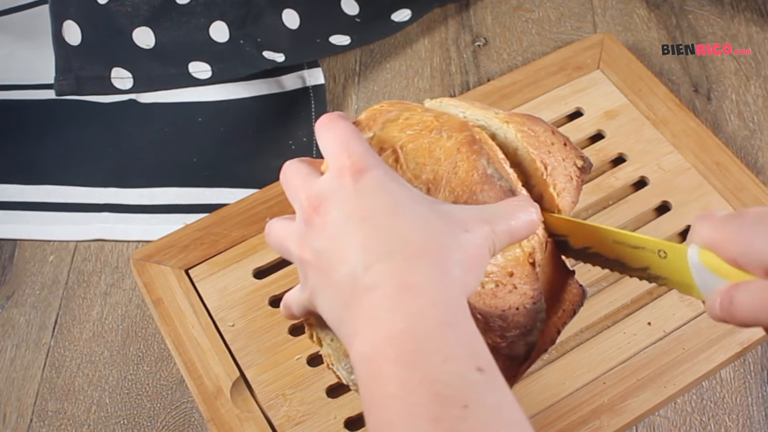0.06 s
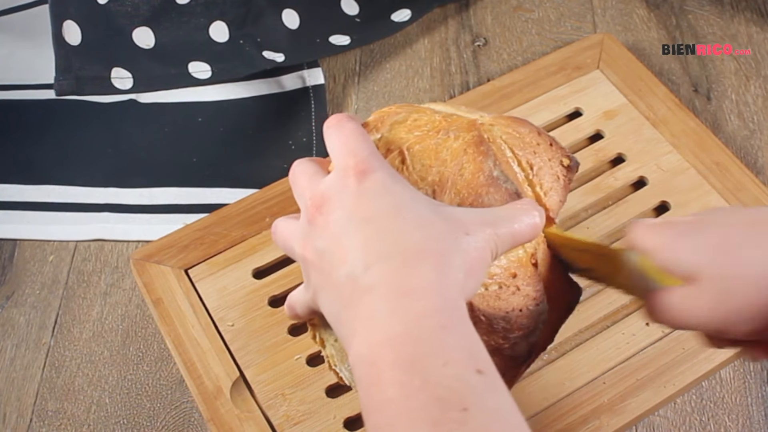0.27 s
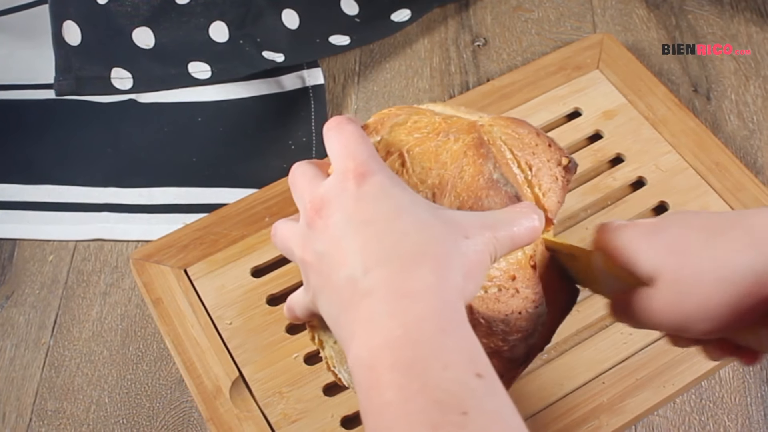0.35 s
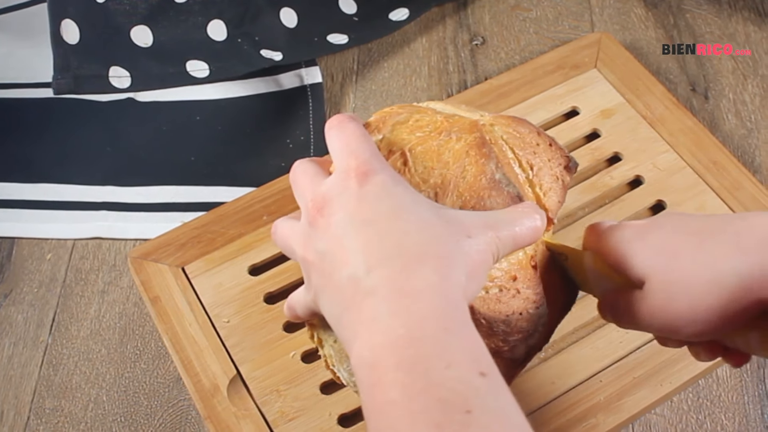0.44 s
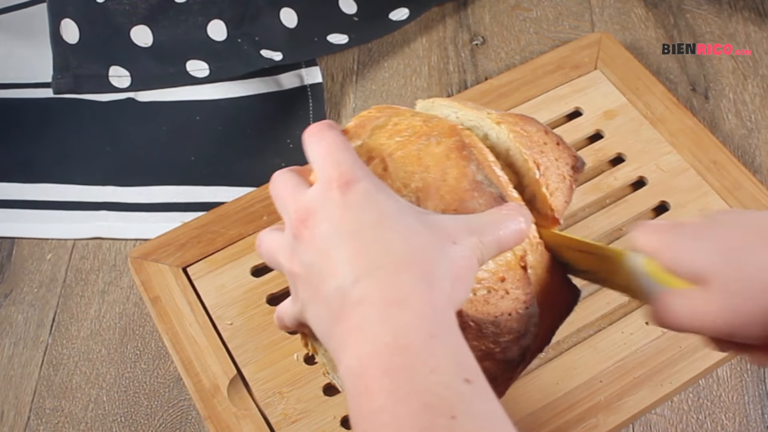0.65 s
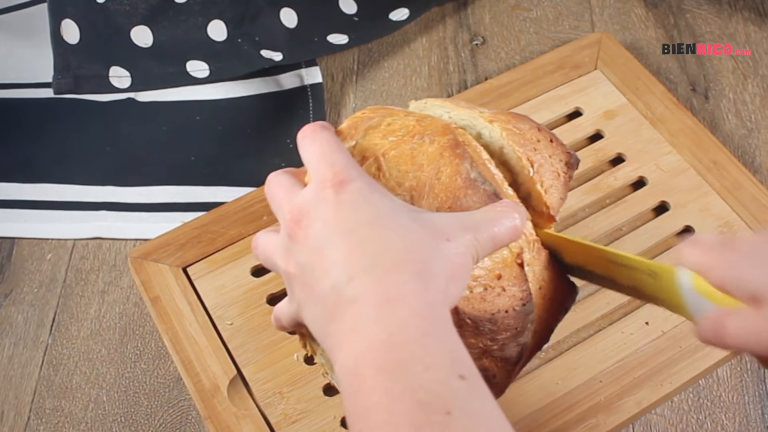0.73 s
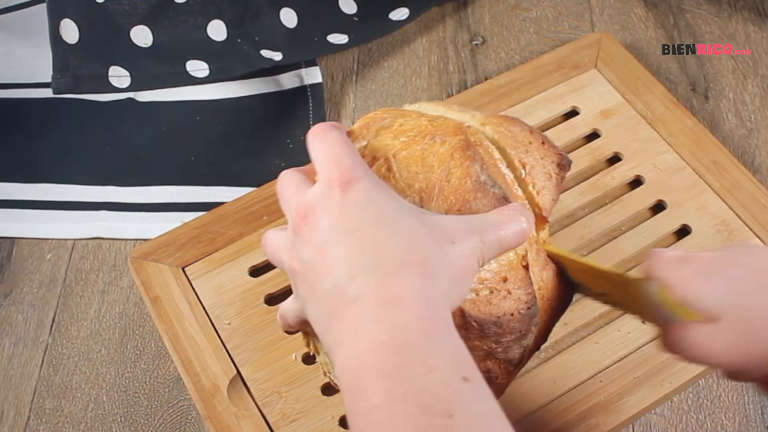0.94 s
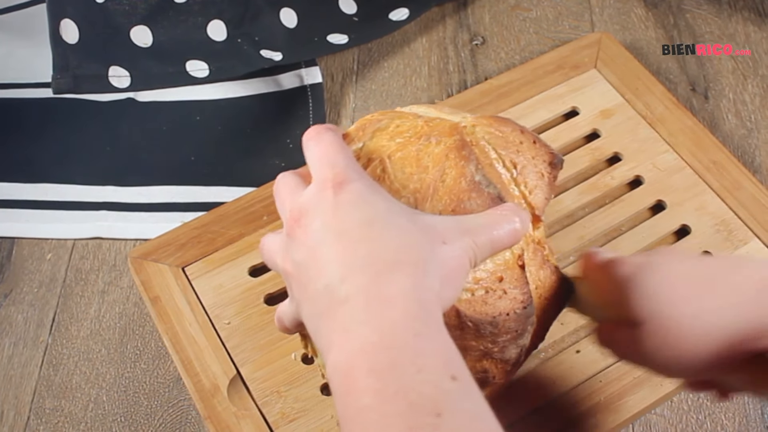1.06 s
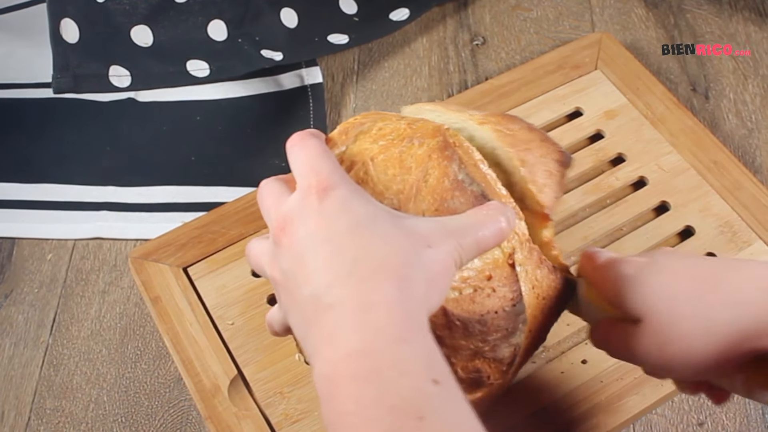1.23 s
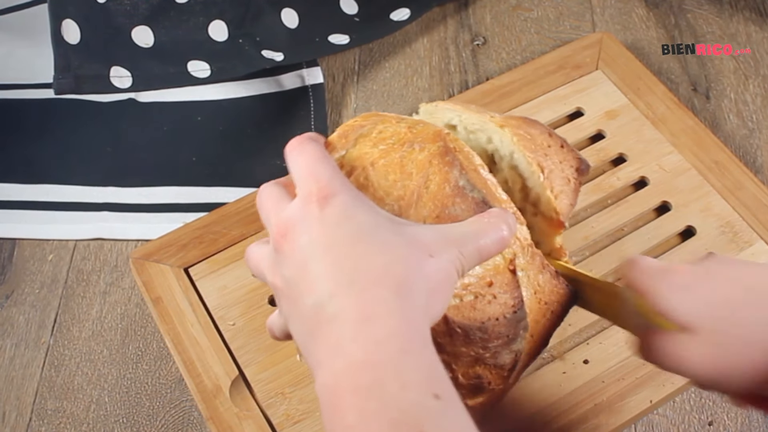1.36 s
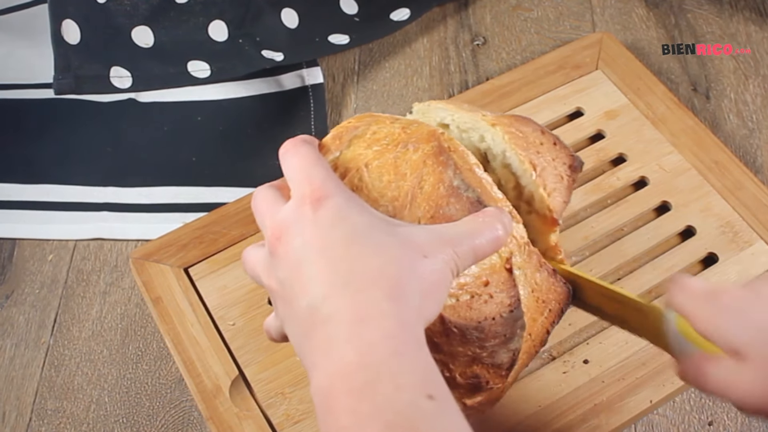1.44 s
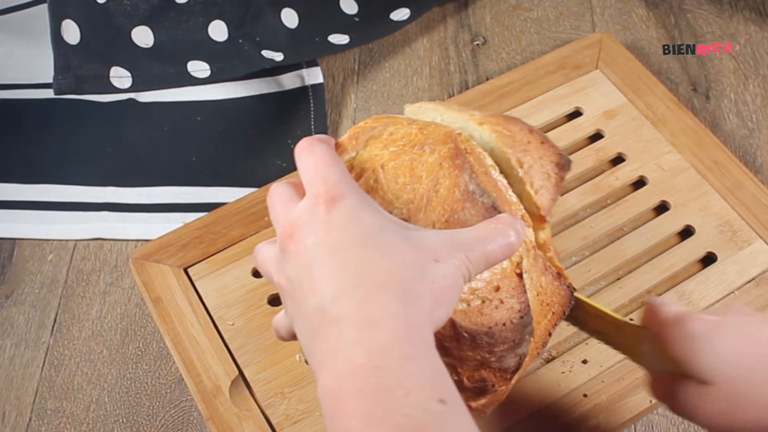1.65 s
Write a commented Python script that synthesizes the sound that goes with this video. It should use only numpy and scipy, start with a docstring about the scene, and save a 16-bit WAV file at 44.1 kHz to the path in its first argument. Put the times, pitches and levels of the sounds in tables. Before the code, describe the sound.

A serrated knife saws a crusty loaf on a wooden board. A soft rasp opens, then a louder, crackling push runs from 0.2 to 0.5 seconds. A light pull follows near 0.7, and the loudest push comes from 1.0 to 1.3, with snapping crust and soft knocks on the board. Fainter strokes follow from 1.3 seconds. A small kitchen rings briefly after each stroke, over quiet room noise.

```python
"""A soft, crunchy rasp comes first, then louder pushes and lighter pulls: a serrated knife is
sawing a crusty loaf on a slatted wooden board. The teeth break the crust in tiny fractures that
crackle in the air and rasp through loaf and board. Now and then a larger flake snaps, or the loaf
knocks the board. A small, bare kitchen rings after each stroke, over quiet room noise."""
import sys
import numpy as np
from scipy import signal
from scipy.fft import rfft, irfft
from scipy.io import wavfile

SR = 44100
rng = np.random.default_rng(int(sys.argv[2]) if len(sys.argv) > 2 else 0)


def dump(signal):
    """Clip the signal to [-1, 1] and save it as 16-bit WAV at the path in sys.argv[1]."""
    limited = np.clip(np.atleast_2d(signal).T, -1, 1)
    pcm = np.round(limited * 32767).astype(np.int16)
    wavfile.write(sys.argv[1], SR, pcm)


N = 74970

# Tone of each sound, from bass to treble. Each row: frequency in Hz, relative level in dB.
ROOM_NOISE_TONE = [(25, -26), (60, 1.5), (120, -2), (300, -3.5), (1000, -17.5), (5000, -4.5), (9000, -35.5),
                   (15000, -65)]
RASP_TONE = [(30, -60), (60, -37), (90, -32), (135, -20), (185, -11), (230, -7), (285, 3.5), (430, 0),
             (580, -2.5), (780, -7), (1000, -9.5), (1400, -13.5), (2000, -17), (3000, -24), (5000, -30.5),
             (15000, -66)]  # the hollow loaf
RUMBLE_TONE = [(25, 1), (42, -53), (60, -13.5), (90, -6.5), (130, -1), (185, 1), (240, -6.5), (500, -24.5),
               (2000, -105)]  # the loaf rocking on the board
SCRAPE_TONE = [(200, -26.5), (600, -4), (1100, 0), (1900, -4), (2700, -16.5), (5000, -20.5), (9000, -28),
               (15000, -62)]  # the side of the blade rubbing
CRACKLE_TONE = [(200, -26), (900, -6), (1900, 0.5), (2900, 4.5), (4600, -1.5), (7300, -0.5), (9500, -4.5),
                (12000, -13), (15000, -38)]  # tiny breaks in the crust
SNAP_TONE = [(300, -39), (1800, -4), (3300, 1), (5500, 5), (8000, 3), (10000, -1.5), (12000, -20),
             (15500, -28)]  # the bright part of a breaking flake
CRACK_TONE = [(150, -12), (600, 12), (1300, 3.5), (2100, -1), (3300, 3.5), (4600, -9.5), (8000, -18.5),
              (15000, -44)]  # its mid-pitched part
# Notes at which the board and blade ring.
# Each row: pitch in Hz, relative level in dB, seconds to fade by 60 dB.
RINGING_NOTES = [(94.3, -24, 0.89), (140.5, -8, 0.18), (174.9, -6, .35), (290, 1.5, 0.58),
                 (340.2, -1.5, 0.3), (412.5, -2.5, 0.55), (562.7, -3.5, 0.13), (690, -13, 0.6),
                 (742.6, -7.5, 0.077), (796, -5.5, 0.6), (882, -49, .25), (1077.7, -7, 0.6),
                 (1199, -4, 0.18), (1443, -9.5, 0.1), (2840, -35, 0.18)]
# The loaf knocking the board. Each row: start in seconds, level in dB, centre pitch in Hz.
BOARD_KNOCKS = [(0.031, -36, 174), (.265, -37.5, 176), (0.48, -22, 338), (.963, -29, 424), (1.03, -24, 286),
                (1.186, -22.5, 289), (1.197, -23.5, 145.2), (1.345, -40, 97.5)]
# Flakes of crust breaking. Each row: start in seconds, levels in dB of the bright snap, the crack
# and the thud in the loaf, then decay time in seconds.
FLAKE_SNAPS = [ (0.149, -36, -53, -49, 0.0023), (.207, -43, -36, -56, 0.0032),
               (0.2379, -16.5, -32.5, -51, 0.0074), (0.257, -28, -43, -38, 0.02),
               (.3245, -35, -35, -45, 0.00037), (0.3364, -21, -12.5, -39, .0015),
               (0.3483, -16, -17, -14, 0.0025), (0.3954, -22, -21, -46, 0.0027),
               (.412, -22.5, -17, -23, 0.0087), (0.4582, -23, -15, -16, 0.0042),
               (0.4715, -31, -21.5, -25, 0.011), (0.4772, -13.5, -8.5, -23, .0045),
               (0.6363, -33, -37.5, -52, 0.006), (.651, -30.5, -27, -36, 0.0045),
               (.657, -50, -24.5, -23, .014), (0.7162, -24.5, -57, -41, .001),
               (0.7703, -29, -29.5, -30, 0.0081), (0.8395, -46, -29.5, -25, 0.0049),
               (0.96, -26, -52, -21.5, 0.0026), (0.986, -28.5, -59, -40, 0.01),
               (1.035, -22.5, -52, -15, 0.0038), (1.048, -22, -41, -19, 0.0095),
               (1.1004, -20.5, -16, -12, 0.0041), (1.128, -23, -11.5, -15.5, 0.0049),
               (1.14, -29, -12.5, -14.5, 0.0086), (1.176, -8.5, -13, -40, 0.0017),
               (1.185, -48, -19, -9.5, 0.0042), (1.206, -16, -15, -21, 0.0011),
               (1.216, -16, -6.5, -17, 0.0024), (1.318, -35, -46, -23.5, 0.0034),
               (1.3306, -21, -45, -33, 0.0027), (1.4196, -55, -29, -56, 0.0035),
               (1.482, -51, -24, -46, 0.0032), (1.498, -30, -42, -35, 0.0019),
               (1.516, -35, -31.5, -58, 0.0062), (1.618, -27.5, -31.5, -41, 0.0048),
               (1.6866, -36, -36, -33, 0.0024)]
# Knife strokes. Each row: start, full bite, easing off and end of the fade in seconds, then six levels
# in dB (rasp at full bite and at easing off, crackle at the same two moments, scrape, rumble).
# If the fade's end comes before easing off, the stroke stops at once when it eases off.
KNIFE_STROKES = [ (-.05, -0.006, .09, 0.34, -35.5, -42.5, -35.5, -46, -35, -44.5),
                 (0.221, 0.309, 0.5, 0.57, -27, -23, -30.5, -29.5, -30.5, -33),
                 (0.649, 0.655, 0.807, 1, -33.5, -37.5, -49.5, -39, -30, -47.5),
                 (0.919, 1.033, 1.185, 1.324, -19.5, -24, -26, -26, -57, -39.5),
                 (1.312, 1.327, 1.404, 1.564, -30, -41.5, -41, -43.5, -38, -59),
                 (1.398, 1.487, 1.535, 1.795, -45.5, -42, -38.5, -42, -38, -52.5),
                 (1.628, 1.684, 1.7, 1.3, -36.5, -43, -40, -58, -51, -57)]


def undb(db):
    """Turn decibels into a number to multiply a sound by."""
    return 10 ** (np.asarray(db) / 20)


def unit(x):
    """Scale a sound to an average power of 1."""
    return x / np.sqrt(np.mean(x ** 2) + 1e-18)


def through(x, response):
    """Pass a sound through an object, given the object's response to one click."""
    return signal.fftconvolve(x, response / np.sqrt(np.sum(response ** 2)))[:N]


def colour(x, tone, size=4096):
    """Filter a sound with a tone table; white noise would keep its level."""
    hz, db = np.array(tone).T
    bin_hz = np.maximum(np.arange(size // 2 + 1) * SR / size, 1)
    gain = undb(np.interp(np.log(bin_hz), np.log(hz), db))
    cepstrum = irfft(np.log(gain))
    cepstrum[1:size // 2] *= 2  # fold it so the filter rings after a click, never before
    cepstrum[size // 2 + 1:] = 0
    return through(x, irfft(np.exp(rfft(cepstrum))))


def room_noise(level_db=-55.5):
    """A quiet, steady rush in the background."""
    return undb(level_db) * colour(rng.standard_normal(N), ROOM_NOISE_TONE)


def kitchen(x, t, split_hz=3500, delay_s=0.006):
    """Bare walls add a wash of echoes whose treble dies sooner."""
    noise = rng.standard_normal(N) * (t > delay_s)
    low = signal.sosfilt(signal.butter(2, split_hz, fs=SR, output="sos"), noise)
    high = signal.sosfilt(signal.butter(2, split_hz, "high", fs=SR, output="sos"), -noise)
    tail = sum(band * undb(db) * unit(undb(-60 * t / fade_s)) / np.sqrt(N)
               for band, db, fade_s in ((low, -9.5, 0.78), (high, -12, 0.62)))
    return x + signal.fftconvolve(x, tail)[:N]


def knocks(t, spread_octaves=0.083, rise_s=0.0022):
    """The loaf bumps the board softly; where it presses decides which notes ring."""
    out = np.zeros(N)
    for start, db, pitch_hz in BOARD_KNOCKS:
        age = np.maximum(t - start, 0)
        onset = 1 - np.exp(-age / rise_s)
        for hz, _, fade_s in RINGING_NOTES:
            nearness = np.exp(-(np.log2(hz / pitch_hz) / spread_octaves) ** 2)
            out += nearness * onset * undb(db - 60 * age / fade_s) * np.sin(2 * np.pi * hz * age)
    return out


def loaf_and_board(push, t, ring_db=-4.5):
    """A push sounds through the damped, hollow loaf, and the board and blade ring with it."""
    ring = sum(undb(db - 60 * t / fade_s) / np.sqrt(fade_s) * np.sin(2 * np.pi * hz * t)
               for hz, db, fade_s in RINGING_NOTES)
    return colour(push, RASP_TONE) + undb(ring_db) * through(push, ring)


def fractures(per_s, spread_db, decay_s=0.00037):
    """Tiny breaks at random moments, each a burst of noise of slightly different strength."""
    happens = rng.random(N) < per_s / SR
    size = undb(spread_db * np.minimum(rng.exponential(size=N), np.pi))
    power = signal.lfilter([1], [1, -np.exp(-2 / (decay_s * SR))], happens * size ** 2)
    return unit(np.sqrt(power) * rng.standard_normal(N))


def flakes(t, thud_cut_hz=216):
    """Each flake breaks in a quick, dying run of fractures: a snap, a crack and a thud."""
    out = np.zeros((3, N))
    runs = np.array([fractures(per_s=14000, spread_db=-0.3) for _ in out])
    for start, snap_db, crack_db, thud_db, decay_s in FLAKE_SNAPS:
        fade = (t >= start) * np.exp(-np.abs(t - start) / decay_s)
        burst = np.array([unit(run * fade) for run in runs]) * np.sqrt(np.mean(fade ** 2))
        out += undb([[snap_db], [crack_db], [thud_db]]) * burst
    snap, crack, thud = out
    # A snap is too brief to move the whole loaf, so its thud has little bass.
    bass_cut = signal.butter(2, thud_cut_hz, "high", fs=SR, output="sos")
    return snap, crack, signal.sosfilt(bass_cut, thud)


def strokes(t, rise_db=28.5, crackle_rise_db=23.5, release_db=23.5, scrape_fade_db_per_s=78):
    """Loudness of rasp, crackle, scrape and rumble: each stroke bites in, holds, then fades or stops."""
    out = np.zeros((4, N))
    for start, full, ease, fade_end, *levels in KNIFE_STROKES:
        rasp_full, rasp_ease, crackle_full, crackle_ease, scrape, rumble = levels
        rise = np.minimum((t - full) / (full - start), 0)  # -1 at the start, 0 from full bite on
        fall_db = release_db * np.minimum((ease - t) / max(fade_end - ease, 1 / SR), 0)
        # The side of the blade rubs hardest as the knife turns round.
        scrape_db = scrape - scrape_fade_db_per_s * np.maximum(t - full, 0)
        db = np.array([np.interp(t, [full, ease], [rasp_full, rasp_ease]) + rise_db * rise,
                       np.interp(t, [full, ease], [crackle_full, crackle_ease]) + crackle_rise_db * rise,
                       scrape_db + rise_db * rise,
                       rumble + rise_db * rise])
        entry = np.clip((t - start) / 0.0086, 0, 1)  # the teeth meet the crust gradually
        out += entry * undb(db + fall_db)
    return out


def sawing(t, teeth_per_s=81, uneven_db=1.2):
    """Teeth catch unevenly, pushing the loaf and clicking in the air; the blade rubs and the loaf rocks."""
    wobble = np.interp(t * teeth_per_s, np.arange(N), rng.standard_normal(N))
    catch = unit(undb(-uneven_db * wobble))
    rasp, crackle, scrape, rumble = catch * strokes(t)
    push = rasp * fractures(per_s=1800, spread_db=0.5)
    clicks = crackle * fractures(per_s=2400, spread_db=0.5)
    rub = scrape * fractures(per_s=4000, spread_db=-1.0)
    rocking = rumble * fractures(per_s=1900, spread_db=-3.5)
    return push, clicks, rub, rocking


def scene():
    """Sawing and snapping crust echo in the kitchen; knocks and room noise are added on top."""
    t = np.arange(N) / SR
    background = room_noise()
    push, clicks, rub, rocking = sawing(t)
    snap, crack, thud = flakes(t)
    body = loaf_and_board(push + thud, t) + colour(rocking, RUMBLE_TONE)
    crust = colour(clicks, CRACKLE_TONE) + colour(rub, SCRAPE_TONE)
    flaking = colour(snap, SNAP_TONE) + colour(crack, CRACK_TONE)
    return (kitchen(body + crust + flaking, t) + knocks(t) + background)[None]


def record(dry, low_cut_hz=50, top_hz=15000):
    """Thin out the deep bass and cut off the highest treble."""
    thinned = signal.sosfilt(signal.butter(3, low_cut_hz, "high", fs=SR, output="sos"), dry)
    return signal.sosfilt(signal.ellip(8, .2, 80, top_hz, fs=SR, output="sos"), thinned)


dry = scene()
out = record(dry)
dump(out)
```